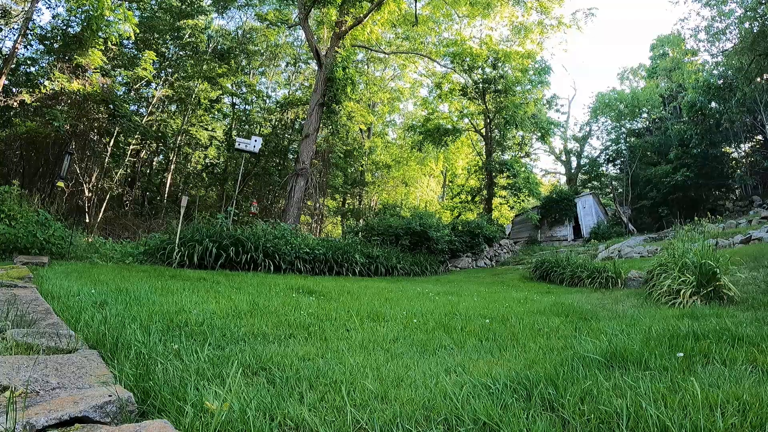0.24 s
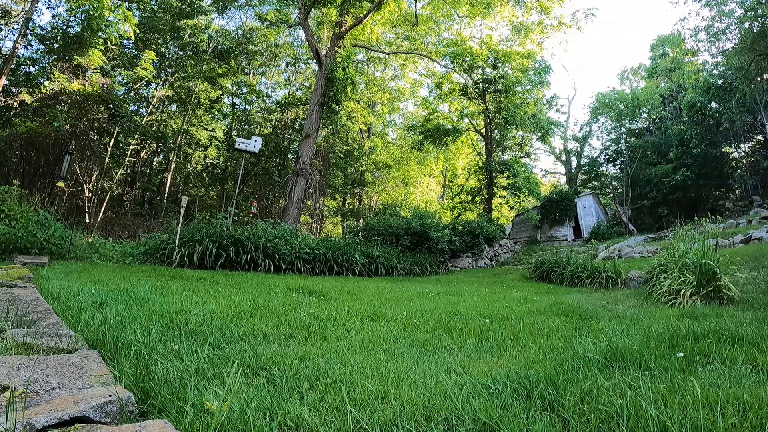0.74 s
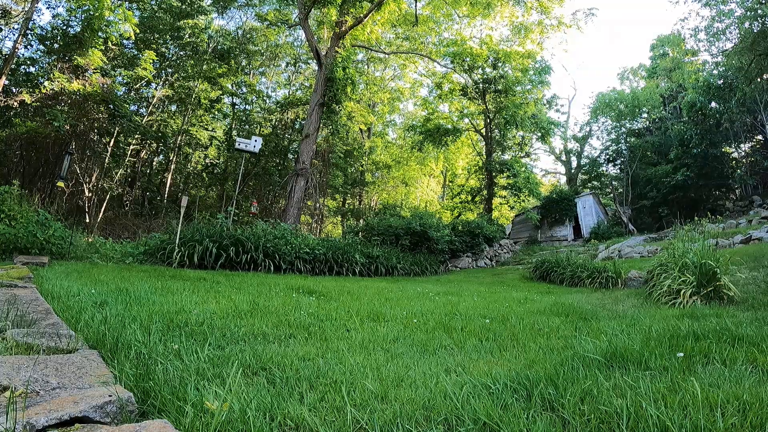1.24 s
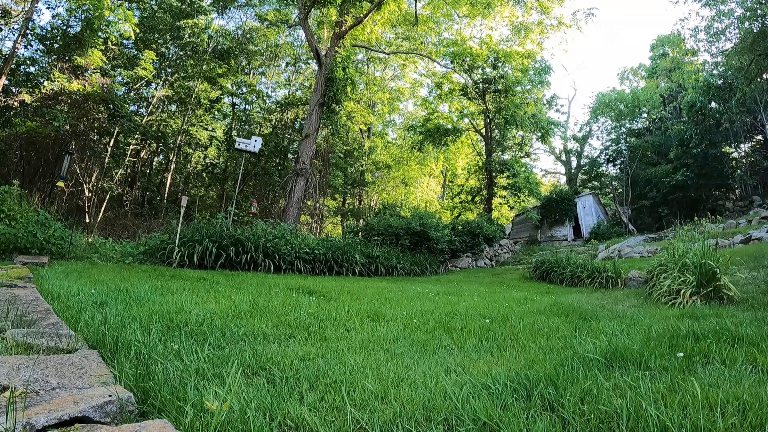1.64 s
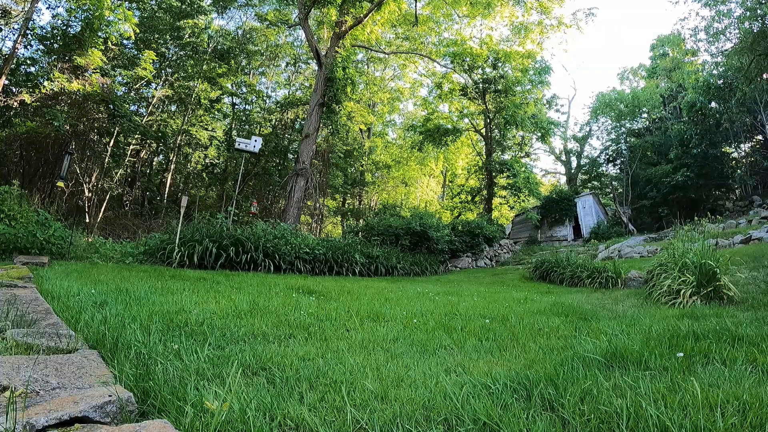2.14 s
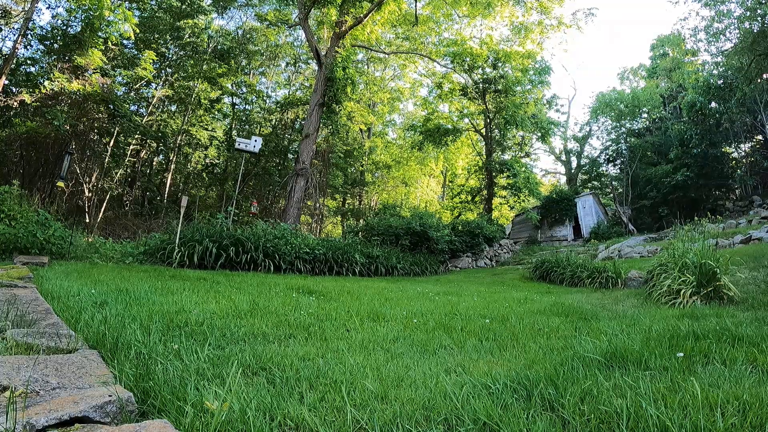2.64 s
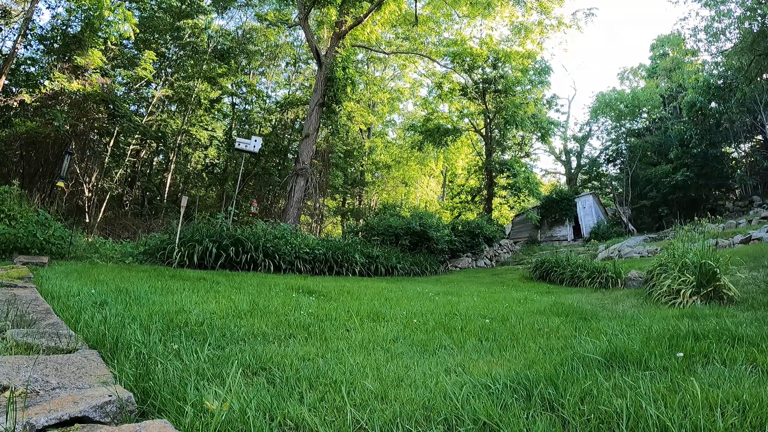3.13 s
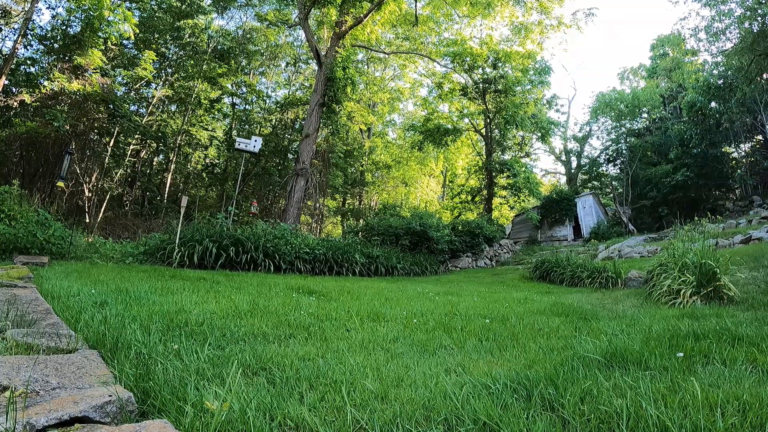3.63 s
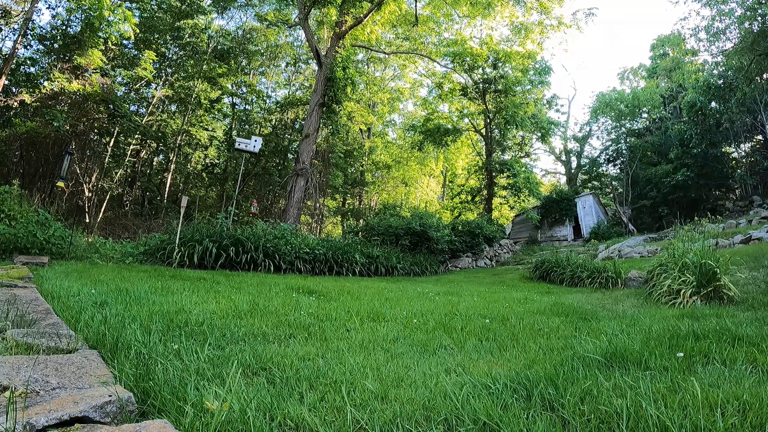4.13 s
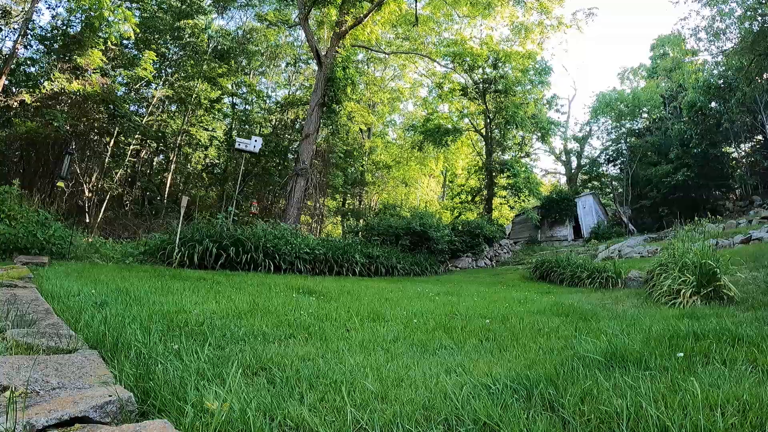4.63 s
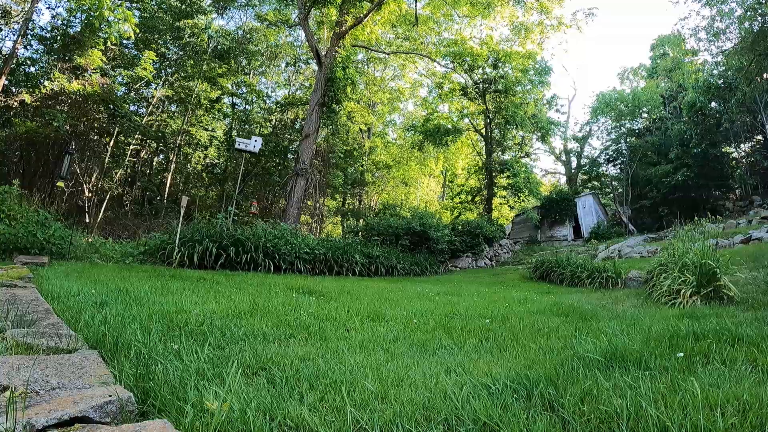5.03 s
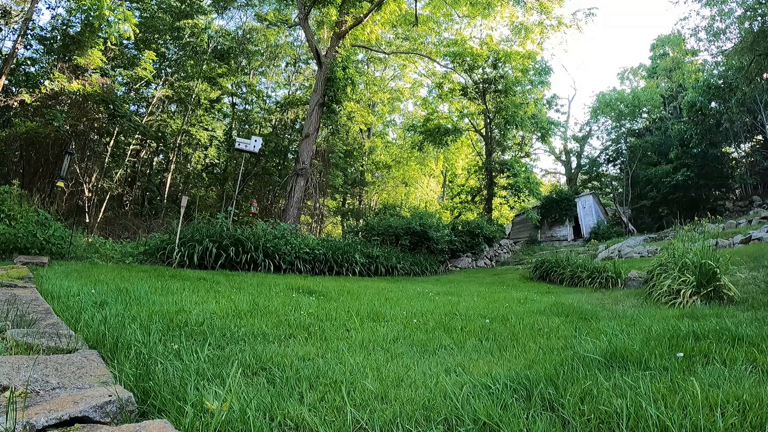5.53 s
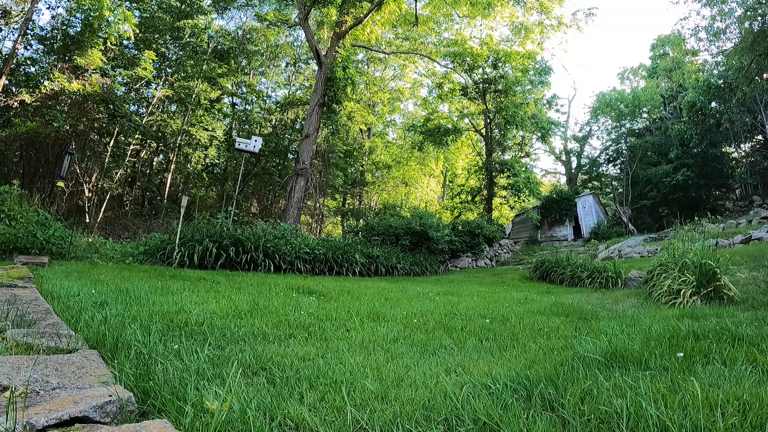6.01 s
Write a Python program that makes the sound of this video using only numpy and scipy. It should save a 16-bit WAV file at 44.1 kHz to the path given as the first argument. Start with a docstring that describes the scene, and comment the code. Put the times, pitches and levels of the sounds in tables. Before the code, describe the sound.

Sparse, bright bird chips ring briefly among backyard trees while a faraway engine hums low, gradually climbing, beneath faint outdoor hiss.

```python
"""Bird chips over far machines

A small bird gives four sharp chips in a quiet backyard: each is one fast downward whistle, a swept sine
with weak harmonics, that the lawn reflects once and the trees scatter into a tail of decaying noise.
Far away an engine drones and slowly speeds up, over a machine hum: tones whose paths fade in and out.
A low rumble and a faint outdoor hiss, both shaped noise, lie beneath."""
import sys
import numpy as np
from scipy import signal
from scipy.fft import rfft, irfft, next_fast_len
from scipy.io import wavfile
from scipy.ndimage import uniform_filter1d, map_coordinates

SR = 44100
rng = np.random.default_rng(int(sys.argv[2]) if len(sys.argv) > 2 else 0)


def inscribe(sig):
    """Save sig as 16-bit PCM at rate SR to the path in sys.argv[1].

    A 1-D sig is mono; a 2-D sig holds one channel per row.
    Samples are clipped to [-1, 1] before scaling.
    """
    pcm = np.round(np.clip(np.atleast_2d(sig).T, -1, 1) * 32767)
    wavfile.write(sys.argv[1], SR, pcm.astype(np.int16))


N = 276547  # length of the scene in samples


def amp(db):
    """Level law: decibels to amplitude gain."""
    return 10 ** (np.asarray(db) / 20)


def unit(x):
    """Normalization: scale to rms 1."""
    return x / np.sqrt(np.mean(np.abs(x) ** 2) + 1e-20)


def along(points, hz):
    """Logarithmic frequency scale: (Hz, value) points interpolated on a log axis."""
    f, v = np.transpose(points)
    return np.interp(np.log(hz + 1), np.log(f + 1), v)


def curves(rows):
    """Linear interpolation in time: one value per sample for each column after the seconds."""
    seconds, *columns = np.transpose(rows)
    t = np.arange(N) / SR
    return [np.interp(t, seconds, column) for column in columns]


def wobble(rate):
    """Band-limited fluctuation: a smooth curve through random knots, rate of them a second."""
    knots = rng.standard_normal(int(N * rate / SR) + 4)
    return map_coordinates(knots, [np.arange(N) * rate / SR])


def filtered(x, response):
    """Linear filtering: the spectrum of x times a response of frequency."""
    length = next_fast_len(x.shape[-1] + SR // 4)
    spectrum = rfft(x, length) * response(np.fft.rfftfreq(length, 1 / SR))
    return irfft(spectrum, length)[..., :x.shape[-1]]


def panned(lean_db):
    """Interaural level difference: left and right gains for left minus right in dB."""
    return amp(np.array([lean_db, -lean_db]) / 2)


def paired(two, alike):
    """Interaural coherence: two unrelated noises mixed into a partly alike left and right."""
    def mid_and_side(hz):
        angle = np.arccos(np.clip(along(alike, hz), -1, 1)) / 2
        return np.array([np.cos(angle), np.sin(angle)])

    mid, side = filtered(two, mid_and_side)
    return np.array([mid + side, mid - side])


def far_tone(hz, unsteady, rate):
    """Multipath fading: a distant tone of rms 1, one steady path plus paths that fade in and out."""
    share = np.clip(unsteady, 0, 1)
    fading = unit(wobble(rate) + 1j * wobble(rate))
    paths = np.sqrt(1 - share) + np.sqrt(share) * fading
    phase = 2 * np.pi * (np.cumsum(hz * np.ones(N)) / SR + rng.random())
    return unit(np.real(paths * np.exp(1j * phase)))


def machines():
    """Superposition of tones: far engines at drifting pitch over hum lines, alike on both sides."""
    # Main engine pitch. Each row: time in seconds, pitch in Hz.
    engine_pitch = [(0, 119), (1, 119.1), (2.2, 120.1), (2.8, 121.3), (3.3, 124), (4.3, 125.1),
                    (5.5, 127.1), (6.27, 127.6)]
    # Main engine swelling and fading on its way. Each row: time in seconds, level in dB before a small trim.
    engine_swell = [(0.0, -51.5), (0.15, -42.5), (1.11, -42.5), (1.26, -52.5), (1.41, -46.5), (1.71, -50),
                    (2.13, -39), (2.37, -46.5), (3.42, -44), (3.51, -51.4), (3.96, -45.7), (4.05, -49.4),
                    (4.32, -45.5), (5.1, -62.5), (5.58, -47.7), (5.73, -66), (6.0, -55), (6.27, -59)]
    # Second, weaker drone. Each row: time in seconds, pitch in Hz, level in dB.
    drone_path = [(0, 237.3, -61), (1, 238.6, -56), (1.7, 239.3, -62.5), (2.3, 248.9, -62.5),
                  (2.9, 256, -60), (3.6, 259, -71.5), (4.3, 260.5, -62), (5.5, 263.7, -61),
                  (6.27, 264.4, -59)]
    # Low hum line that comes and goes. Each row: time in seconds, level in dB before a small trim.
    throb_swell = [(0.0, -60), (0.33, -46), (1.74, -58), (2.07, -46), (2.37, -60.2), (2.73, -49.5),
                   (2.85, -63), (2.94, -55), (3.39, -63.5), (3.78, -43), (4.26, -66), (4.38, -59.5),
                   (5.07, -48), (5.34, -73), (5.49, -45), (5.64, -46), (5.76, -60.8), (6.27, -46)]
    # Continuous hum lines. Each row: pitch in Hz, level in dB, unsteadiness from 0 to 1.
    hum_lines = [(59.5, -55.5, 0.15), (66.4, -58, 0.5), (150.4, -59, 0.38), (167.1, -61.5, 0.82),
                 (204.9, -57.5, 0.52)]

    t = np.arange(N) / SR
    engine_hz, = curves(engine_pitch)
    engine_db, = curves(engine_swell)
    drone_hz, drone_db = curves(drone_path)
    throb_db, = curves(throb_swell)
    # a higher hum line grows out of the rumble, then holds
    rising_from_db, rising_to_db = -62.5, -54.5
    rising_start_s, rising_takes_s = 2.55, 0.8
    risen = np.clip((t - rising_start_s) / rising_takes_s, 0, 1)
    rising_db = rising_from_db + (rising_to_db - rising_from_db) * risen

    engine = amp(engine_db - 0.12) * far_tone(engine_hz, unsteady=0.073, rate=16)
    drone = amp(drone_db) * far_tone(drone_hz, unsteady=0.25, rate=7)
    throb = amp(throb_db + 0.2) * far_tone(hz=86.9, unsteady=0.16, rate=11)
    rising = amp(rising_db) * far_tone(hz=178.6, unsteady=0.6, rate=11)
    hum = sum(amp(db) * far_tone(hz, unsteady, rate=6) for hz, db, unsteady in hum_lines)
    return engine + drone + throb + rising + hum


def rush(spectrum, patchy_db):
    """Diffuse field: shaped stereo noise of rms 1 with soft time-frequency patches of random gain."""
    # Coherence of the two sides. Each row: frequency in Hz, left-right likeness from 0 to 1.
    likeness = [(60, 0.99), (130, 0.99), (250, 0.92), (500, 0.67), (1000, 0.56), (2100, 0.53), (4300, 0.73),
                (8700, 0.67)]
    # Balance of the two sides. Each row: frequency in Hz, left minus right in dB.
    balance = [(150, 0.5), (550, -0.1), (950, -0.5), (1660, 2), (2900, 3), (5000, 1), (8700, 5)]

    z = signal.stft(rng.standard_normal((2, N)), nperseg=512)[2]
    field = uniform_filter1d(rng.standard_normal(z.shape[1:]), size=6, axis=0)  # across frequency
    field = uniform_filter1d(field, size=18, axis=1)  # across time
    patchy = z * amp(patchy_db * unit(field))
    two = signal.istft(patchy, nperseg=2 * (z.shape[1] - 1))[1][:, :N]
    stereo = paired(two, likeness)
    return unit(filtered(stereo, lambda hz: amp(along(spectrum, hz)) * panned(along(balance, hz))))


def air():
    """Broadband ambient noise: distant traffic's rumble shifts slowly upward under a thin, even hiss."""
    # Deep rumble spectrum. Each row: frequency in Hz, relative level in dB.
    deep_spectrum = [(12, -12), (22, -0.5), (30, -6.5), (45, 0), (65, -3), (105, 1), (140, -5), (185, -3.5),
                     (250, -8.5), (295, -13.5), (400, -17), (500, -20.5), (620, -35.5), (3000, -120)]
    # Upper rumble spectrum. Each row: frequency in Hz, relative level in dB.
    upper_spectrum = [(60, -41), (130, -27), (170, -2), (220, -0.5), (255, -0.5), (300, -11.5), (450, -22),
                      (3000, -120)]
    # Hiss spectrum. Each row: frequency in Hz, relative level in dB.
    hiss_spectrum = [(350, -26.5), (600, -8.5), (760, -9), (920, -7.5), (1050, -1.5), (1330, 0), (2130, -6),
                     (3800, -10.5), (5200, -10.5), (7500, -17.5), (8400, -25), (10300, -32.5),
                     (12400, -34.5), (16000, -91)]

    t = np.arange(N) / SR
    deep_db = -48 - 0.37 * t  # the deep part ebbs, in dB per second
    upper_db = -66.5 + 1.93 * t  # while the upper part grows
    deep = amp(deep_db) * rush(deep_spectrum, patchy_db=1.5)
    upper = amp(upper_db) * rush(upper_spectrum, patchy_db=0.5)
    hiss = amp(-62.5) * rush(hiss_spectrum, patchy_db=0.92)
    return deep + upper + hiss


def chip(t, upper, lower, start_hz, high_db, overtone_db, closing_db):
    """Frequency modulation: a whistle dives in two stages to a faint low note; t is time from its knee."""
    # Dive of the whistle. Each row: stage (-1 start, 0 knee, 1 end of the loud part), pitch in Hz
    # before the part ahead of the knee is stretched to start_hz.
    sweep = [(-1, 8700), (-.6, 7850), (-.35, 7150), (-.14, 6200), (0, 5200), (.14, 4680), (.36, 4350),
             (.65, 3930), (.95, 3330), (1.5, 1550), (2.2, 1050)]
    # Strength of the whistle as it dives. Each row: its pitch in Hz, relative level in dB.
    whistle = [(2200, -35), (2900, -20.5), (3350, -6), (3900, -4), (4400, -2), (5200, -5), (6100, -12),
               (7200, -4), (7900, -10), (8500, -16), (9200, 4)]
    # Second harmonic. Each row: the whistle's pitch in Hz, level against the whistle in dB before overtone_db.
    second = [(3300, -11), (4000, -11.5), (4700, -19), (5200, -25)]
    # Faint third harmonic. Each row: its own pitch in Hz, level against the whistle in dB before overtone_db.
    third = [(10300, -34), (11500, -23), (12400, -28), (13200, -33), (15000, -40)]

    stages, pitch = np.transpose(sweep)
    stage = np.where(t < 0, t / upper, t / lower)
    early = np.clip(-stage, 0, 1)  # 1 at the start, 0 from the knee on
    hz = np.interp(stage, stages, pitch) * (start_hz / pitch[0]) ** early
    phase = 2 * np.pi * np.cumsum(hz) / SR

    fade_in = np.clip((stage - stages[0]) / 0.19, 0, 1)
    fade_out = np.clip((stages[-1] - stage) / 0.085, 0, 1)
    loud = amp(along(whistle, hz) + high_db * np.clip(3 * early, 0, 1))
    closing = amp(closing_db) * np.exp(-((hz - 1320) / 240) ** 2)  # low note around 1320 Hz
    fundamental = (loud + closing) * np.sin(phase)

    overtones = amp(along(second, hz)) * np.sin(2 * phase)
    overtones = overtones + amp(along(third, 3 * hz)) * np.sin(3 * phase)
    bright = amp(overtone_db) * np.clip(stage / 0.083, 0, 1)  # overtones appear after the knee
    return np.sqrt(2) * fade_in * fade_out * (fundamental + loud * bright * overtones)


def ground(hz, delay_s, bounce_db):
    """Comb filtering: a lawn bounce beats with the direct sound, swelling and dipping it; deeper on the left."""
    bounce = amp(bounce_db + np.array([[3], [-3]]))
    return (1 + bounce * np.exp(-2j * np.pi * hz * delay_s)) / np.sqrt(1 + bounce ** 2)


def trees(build_s):
    """Multiple scattering: trunks and leaves answer with noise decaying at a rate set by frequency."""
    # Decay of the tail. Each row: frequency in Hz, time to fall by 60 dB in seconds.
    decay = [(1200, 0.39), (4200, 0.97), (7500, 0.66), (12000, 0.53)]
    # Colour of the tail. Each row: frequency in Hz, echo gain in dB.
    colour = [(1200, -1.5), (3000, -9), (3600, -5), (4500, -6.5), (5800, 0.5), (7500, 2), (8700, 2),
              (10000, 5.5), (11500, 6), (14500, 8)]
    alike = [(1000, 0.43), (4300, 0.6), (8700, 0.68), (12000, .25)]  # (Hz, left-right likeness)

    hz, t, z = signal.stft(rng.standard_normal((2, SR * 4 // 5)), SR, nperseg=256)
    decayed = z * amp(-60 * t / along(decay, hz)[:, None])
    tail = signal.istft(decayed, SR, nperseg=256)[1]
    t = np.arange(tail.shape[1]) / SR
    near = 1 + .5 * np.exp(-t / 0.032)  # the nearest surfaces answer most strongly
    build = 1 - np.exp(-t / build_s)
    tail = paired(tail * near * build, alike)
    tail = tail / np.linalg.norm(tail[0])  # left energy 1 ahead of the colouring
    return filtered(tail, lambda hz: amp(along(colour, hz)))


def bird():
    """Direct and scattered sound: each chip arrives with level and phase differences, then from the trees."""
    # Calls. Each row: time of the sweep's knee in seconds, fall to the knee in seconds, fall after it (one
    # stage) in seconds, starting pitch in Hz, call level in dB ahead of the path gains, then gains in dB of
    # the high part, echo (ahead of a 3 dB cut), overtones and low closing note.
    calls = [(1.1709, .017, 0.0102, 9150, -39, -2.5, 3.5, 1.5, -9.5),
             (4.1380, .0155, 0.013, 8450, -34, -8, 4, -4, -24),
             (5.1798, .0158, .013, 8700, -30.5, -4, 1.5, -3.5, -39),
             (6.1706, 0.0155, 0.011, 8750, -27.5, -8.5, 0.5, -6, -22.5)]
    # (Hz, left minus right dB) of the direct sound, then of the echo
    lean = [(3200, -2), (3900, -7), (4500, -9), (5300, -6), (6800, -2), (8200, 2), (12000, 2)]
    echo_lean = [(3300, 4.0), (4400, -1.0), (6000, 0), (7300, 3.0), (12000, 2.5)]
    # (Hz, radians by which left leads) of the direct sound
    turn = [(2000, -0.00069), (3700, -1.7), (4500, -1.4), (5400, -0.74), (7200, 0.95), (9000, 0.5)]

    def direct_path(hz):
        phases = np.exp(.5j * np.outer([1, -1], along(turn, hz)))
        return panned(along(lean, hz)) * phases * ground(hz, delay_s=0.001128, bounce_db=-9)

    out = np.zeros((2, N + 2 * SR))  # room for the last tail
    lead = SR // 32  # samples ahead of the knee
    t = np.arange(-lead, 2 * lead) / SR
    for knee_s, upper, lower, start_hz, db, high_db, echo_db, overtone_db, closing_db in calls:
        knee = round(knee_s * SR)
        from_knee = t + (knee / SR - knee_s)  # keeps the fraction of a sample
        call = amp(db) * chip(from_knee, upper, lower, start_hz, high_db, overtone_db, closing_db)
        direct = filtered(call, direct_path)
        echo = amp(echo_db - 3) * signal.fftconvolve(call[None], trees(build_s=0.0055), axes=1)
        at = knee - lead
        out[:, at:at + len(t)] += amp(-3.5) * direct
        out[:, at:at + echo.shape[1]] += filtered(echo, lambda hz: panned(along(echo_lean, hz)))
    return out[:, :N]


def scene():
    """Superposition: the far machines and the open air add to the bird."""
    return machines() + air() + bird()


def record(dry):
    """Band limiting: only frequencies below 15.2 kHz pass."""
    return filtered(dry, lambda hz: hz < 15200)


dry = scene()
out = record(dry)
inscribe(out)
```